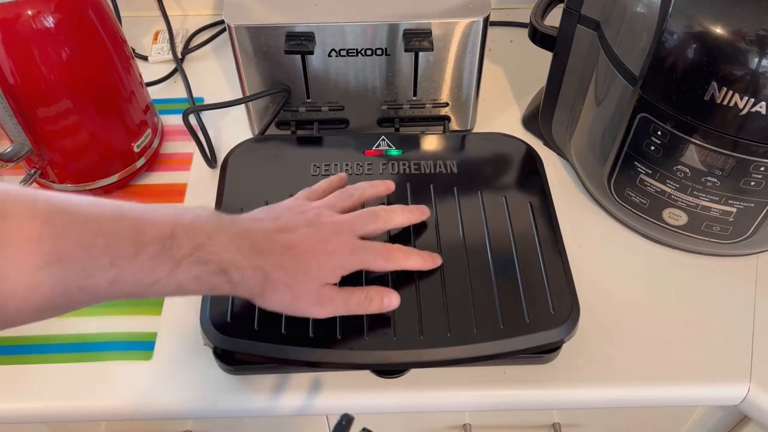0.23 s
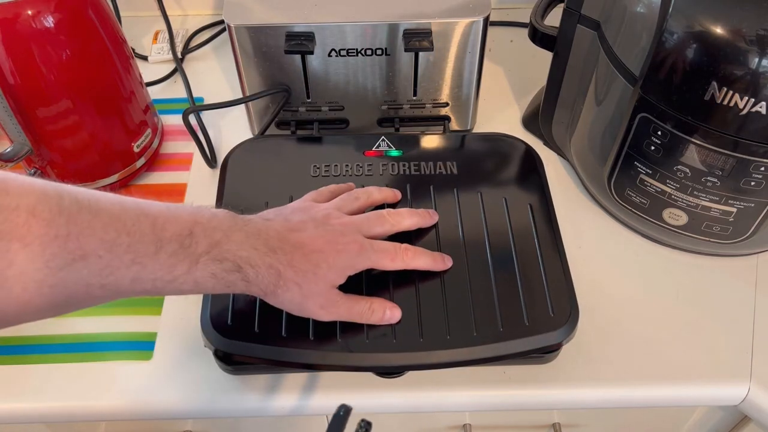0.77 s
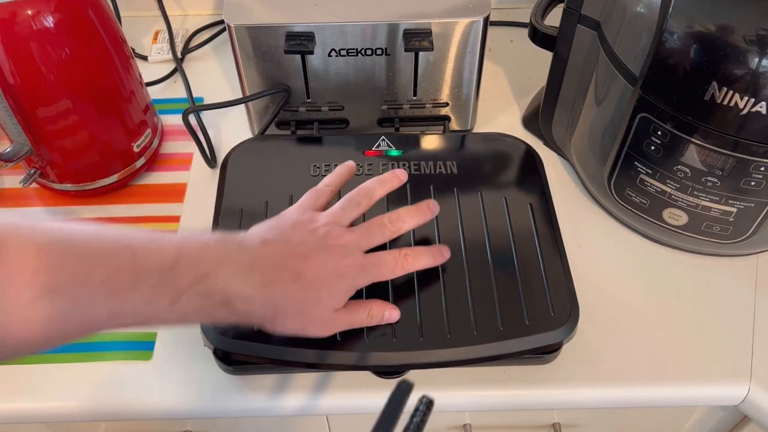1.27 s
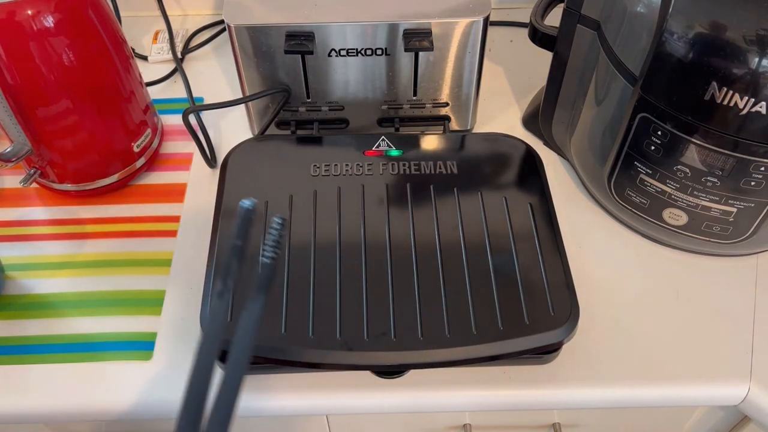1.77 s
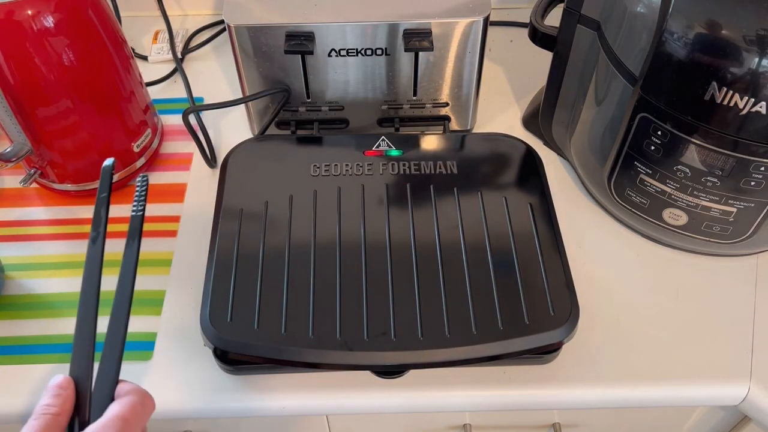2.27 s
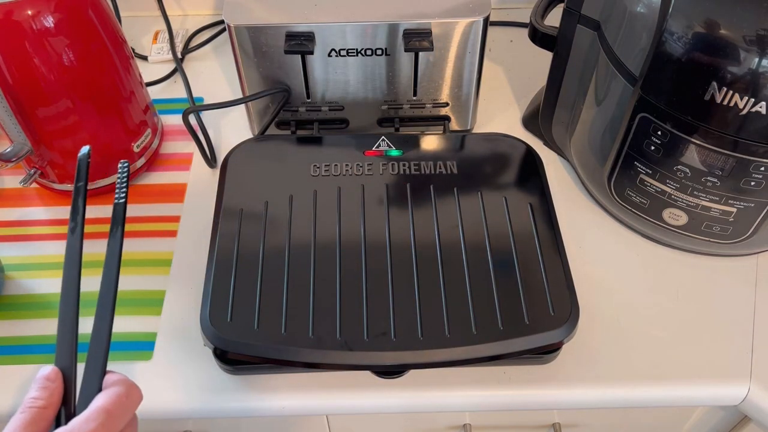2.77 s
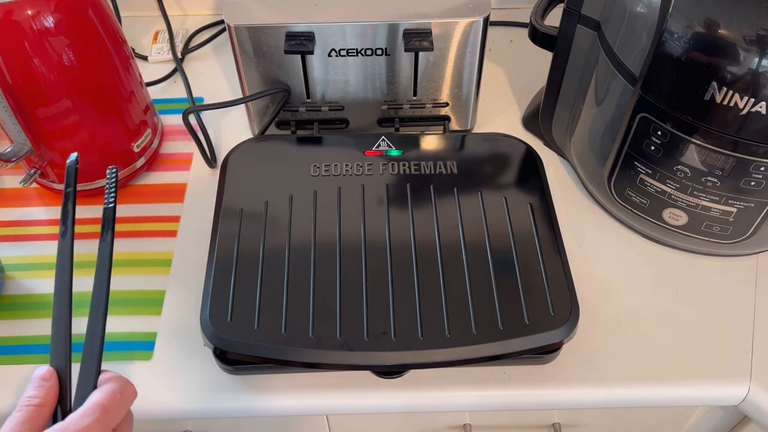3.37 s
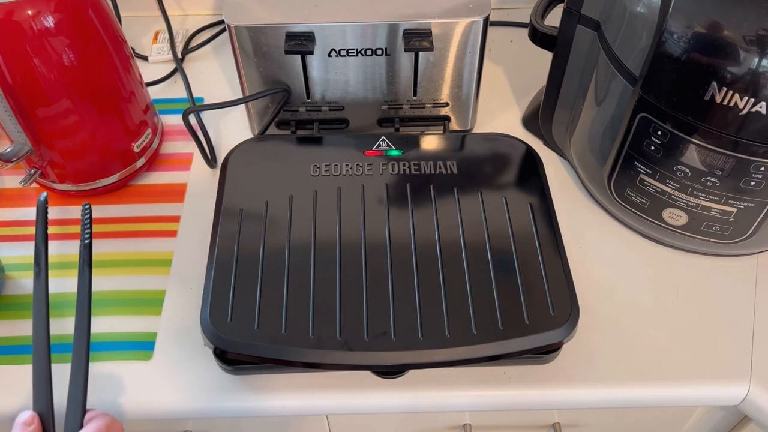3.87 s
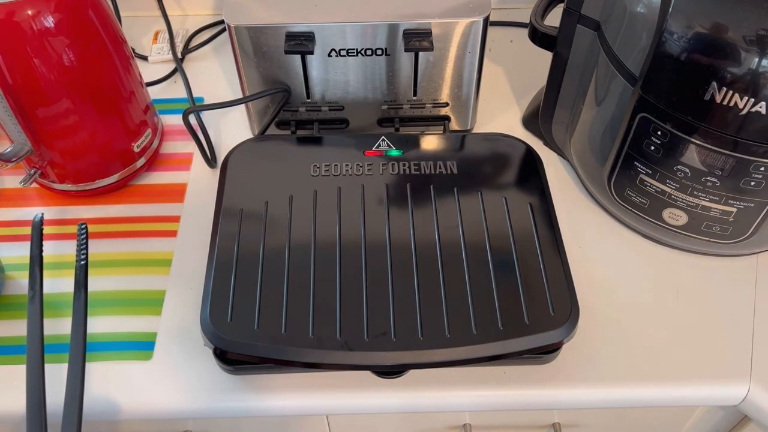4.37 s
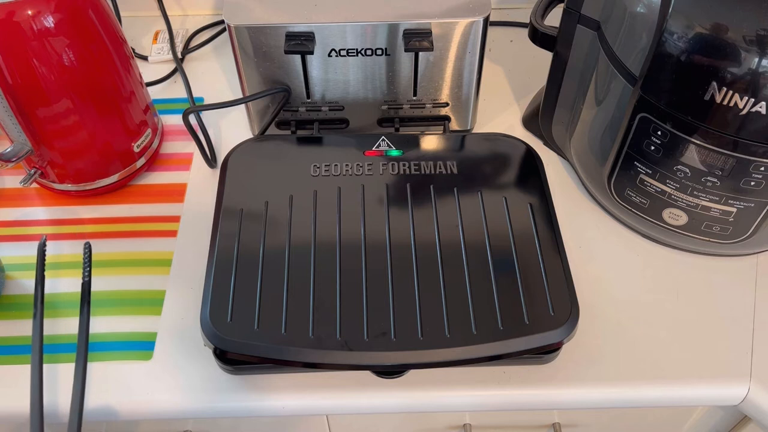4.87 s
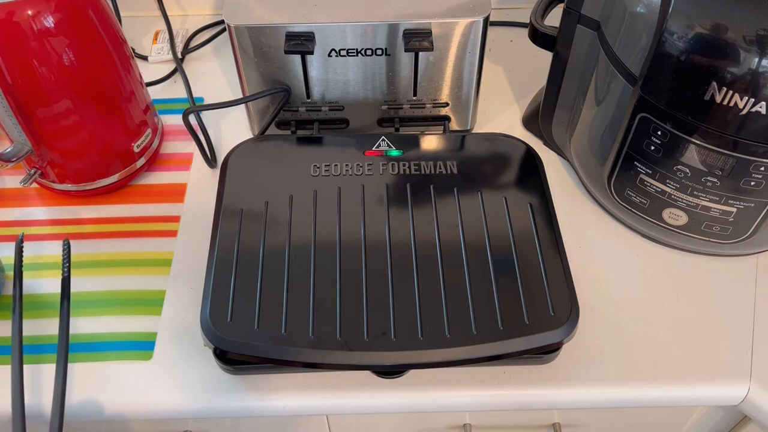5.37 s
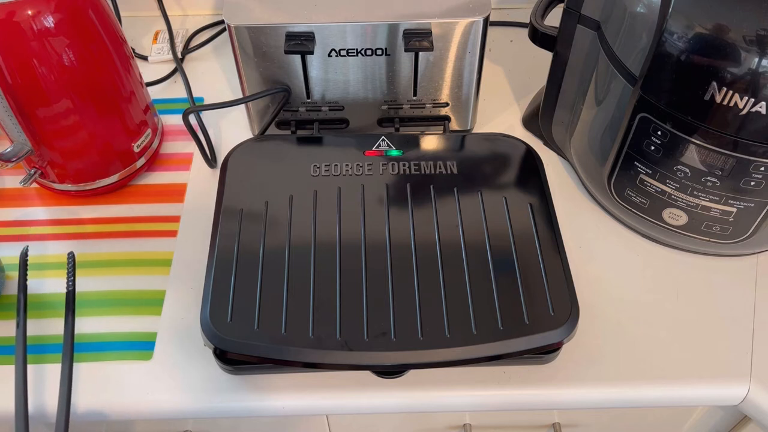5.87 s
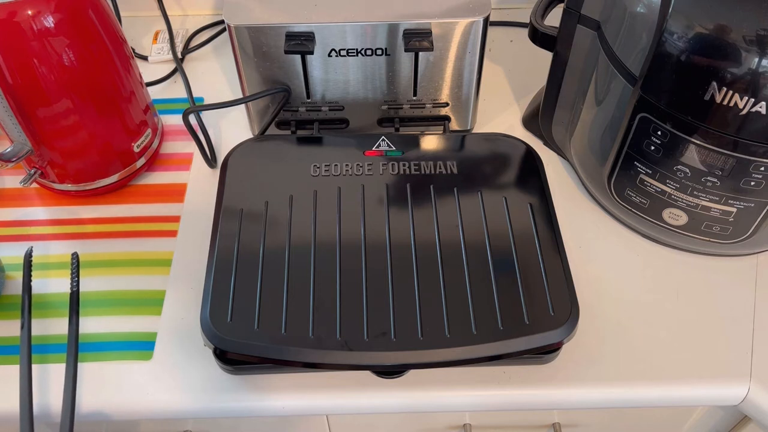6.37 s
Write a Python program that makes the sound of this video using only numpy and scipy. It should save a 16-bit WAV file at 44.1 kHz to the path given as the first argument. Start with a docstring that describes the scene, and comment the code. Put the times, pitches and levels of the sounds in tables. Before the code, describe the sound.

In a kitchen, close up, chicken fries under the closed lid of an electric grill with a dense, bright, steamy hiss. A hand press makes it swell for about a second, then it gradually settles. Small fat spits tick as it eases, tongs make one faint dull bump, and a crisp thermostat click comes near the end. Low appliance hum and soft rumble lie underneath.

```python
"""Chicken on a closed grill

Chicken sizzles under the lid of an electric grill: showers of tiny random bursts over a smooth hiss of steam,
coloured by the hollow between the plates. A hand presses the lid for about a second and the hiss swells, then
settles as the plate dries. Fat spits in short puffs of noise, tongs are picked up with a soft bump of low noise,
and the thermostat clicks near the end with ringing tones and a knock. Hum tones and a low rumble lie underneath.
"""
import sys
import numpy as np
from scipy import signal
from scipy.fft import rfft, irfft, next_fast_len
from scipy.io import wavfile
from scipy.ndimage import map_coordinates

SR = 44100
rng = np.random.default_rng(int(sys.argv[2]) if len(sys.argv) > 2 else 0)


def waveform_to_disk(signal):
    """Save audio, clipped to [-1, 1], as 16-bit WAV at the path in sys.argv[1]."""
    frames = np.transpose(np.atleast_2d(signal))
    scaled = np.clip(frames, -1, 1) * 32767
    samples = np.round(scaled).astype(np.int16)
    wavfile.write(sys.argv[1], SR, samples)


N = 291962  # length in samples

# The hand bears down on the lid and lets go; the squeeze takes a moment to build and to end (all in seconds).
PRESS_S, LIFT_S, ATTACK_S, RELEASE_S = 0.27, 1.1, 0.13, 0.21
# Extra boiling from the squeeze and from juice lying on the plate, which dries once the hand lifts.
SQUEEZE_DB, WET_DB, DRYING_S = 2.5, 5.5, 0.8
# Later the hiss rises a little by itself: time of the peak, width, and height.
RISE_S, RISE_WIDTH_S, RISE_DB = 4.6, 0.5, 0.5
# The sizzle at rest: bubbles a second, hiss, hollow ring under the lid, and spatter relative to the hiss.
BUBBLES_PER_S, HISS_DB, HOLLOW_DB, SPATTER_DB = 2900, -44.5, -48, -16
# How many dB the ring and the spatter's share gain for each dB of boiling.
HOLLOW_GROWS, SPATTER_GROWS = 0.83, 0.68

# Tone of bursting bubbles heard through the gap round the lid. Each row: pitch in Hz, level in dB per Hz.
FIZZ_TONE = [(1200, -22), (2600, -4), (4500, -2.2), (6300, -2.8), (7700, -.3), (8700, 0), (9500, -1.7),
             (10100, -3.3), (10800, 1.6), (11500, 2.8), (12100, -2.7), (13300, -5), (14800, -2.5),
             (16000, -4)]
# Tone of squeezed juice spattering on the hot plate. Each row: pitch in Hz, level in dB per Hz.
SPATTER_TONE = [(900, -20), (1300, 3), (2000, -12), (3200, 7.5), (4200, 0.5), (5500, -4), (9000, -5),
                (15000, -22)]
# Tone of the hollow between the plates. Each row: pitch in Hz, level in dB per Hz.
HOLLOW_TONE = [(150, -25), (330, -9), (470, -1), (590, -15), (820, -8), (1000, -1.5), (1250, -4),
               (1420, -5), (2300, -7.5), (3000, -13.5), (5000, -22)]
# Air resonances between the plates. Each row: centre in Hz, width in Hz, lift in dB (negative is a dip).
CAVITY_RESONANCES = [(965.6, 26.6, 11), (1143, 133, 6.5), (1574, 50, 5), (1682, 41, 9), (1967, 29, 5),
                     (2140, 60, 5.5), (2266, 70, 3.5), (3078, 77, 5), (3370, 150, 3), (3550, 104, -4),
                     (3740, 51, 3.5), (3880, 110, -5), (4000, 85, 4.5), (4260, 130, 3), (5030, 70, 3)]
# Reflections off the toaster, the cupboards and the walls. Each row: delay in seconds, level in dB.
REFLECTIONS = [(.0059, -24), (.0083, -21), (.0113, -20), (.0139, -20), (.0177, -20), (.0231, -21)]
# Single spits of fat. Each row: start in seconds, level in dB.
FAT_SPITS = [(1.284, -29), (1.423, -35), (1.65, -42), (3.596, -44), (4.514, -49), (4.747, -34)]
# Tone of a spit's puff. Each row: pitch in Hz, level in dB per Hz.
PUFF_TONE = [(2000, -16), (7000, -10), (11500, 12), (15000, -8)]
# Tone of the tongs' bump. Each row: pitch in Hz, level in dB per Hz.
BUMP_TONE = [(80, -10), (190, -1), (400, -2), (750, -7), (1500, -22)]
# The thermostat's spring snaps over, hits its stop and bounces.
# Each row: start in seconds, level of the ring in dB, level of the knock on the housing in dB.
THERMOSTAT_SNAPS = [(6.055, -32, -36.5), (6.0585, -31, -46), (6.0653, -50, -45)]
# The spring's ringing tones. Each row: pitch in Hz, level in dB, time to fall by 60 dB in seconds.
SPRING_TONES = [(4490, -8, .035), (5030, 0, .042), (5110, -21, .16), (5290, -11, .03), (5800, -14, .02)]
# Tone of the housing's knock. Each row: pitch in Hz, level in dB per Hz.
HOUSING_TONE = [(200, -14), (430, 1), (620, -2), (800, 2), (1300, -3), (2200, -2), (3000, -9), (5500, -7),
                (8000, -16), (15000, -20)]
# Hum lines of the mains and an appliance motor. Each row: pitch in Hz, rms level in dB.
HUM_LINES = [(27, -73), (50, -65), (68.8, -64.5), (93.4, -50.5), (100, -66), (137.5, -73), (181, -75.5),
             (186.8, -71.5), (200, -73.5), (240.2, -68), (319.5, -69.5)]
# One more hum line swells and fades twice. Each row: peak in seconds, width in seconds, rms level in dB.
WAVER_SWELLS = [(1.5, 0.79, -63), (4.85, 1.63, -62.5)]
WAVER_HZ = 162.6
# Tone of the kitchen's rumble. Each row: pitch in Hz, level in dB per Hz.
RUMBLE_TONE = [(25, -16), (40, -8), (52, -5), (72, 4), (95, -1), (115, -5), (280, -5), (360, -3.5),
               (600, -19), (2000, -21.5)]

# How alike the two microphone ports hear. Each row: pitch in Hz, likeness from 0 to 1.
PORT_LIKENESS = [(100, .99), (350, .87), (650, .6), (1050, .84), (1500, .3), (2200, .68), (4400, .67),
                 (6200, .47), (8400, .85), (11500, .92), (15000, .88)]
# Loudness of left over right. Each row: pitch in Hz, left minus right in dB.
PORT_BALANCE = [(280, -.5), (450, 2.2), (680, -1), (1100, 2.2), (1700, 2.5), (2200, .6), (4300, 3.8),
                (7000, 3.2), (7700, 0)]
# Phase between the ports. Each row: pitch in Hz, lead of the left port in radians.
PORT_LEAD = [(300, 0.57), (1600, -0.64), (2400, 0.5), (3200, 1.36), (4500, 0.22), (6200, 0.26),
             (7300, 0.89), (8300, 0.11)]
TREBLE_HZ, TREBLE_LAG_S = 8300, 0.000277  # above this pitch the left port's lag grows by this delay
TOP_HZ = 15780  # nothing is kept from here up


def sizzle():
    """Juice boils on the plate: more boiling means more bubbles a second and a larger share of spatter."""
    surge_db = boiling()
    rate = BUBBLES_PER_S * amp(surge_db)
    fizz = reflected(under_lid(bubbles(rate, spread_db=2.5, steam_db=1.5), FIZZ_TONE))
    spatter = reflected(under_lid(bubbles(rate / 2, spread_db=4.5, steam_db=-0.5), SPATTER_TONE))
    ring = under_lid(bubbles(rate, spread_db=3, steam_db=1), HOLLOW_TONE)
    frying = fizz + amp(SPATTER_DB + SPATTER_GROWS * surge_db) * spatter
    # The boiling flutters: small random level changes, slow and fast.
    flutter_db = 0.1 * wobble(9) + 0.33 * wobble(45)
    hiss_db = HISS_DB + surge_db + flutter_db
    hollow_db = HOLLOW_DB + HOLLOW_GROWS * surge_db + 0.26 * wobble(13)
    return amp(hiss_db) * frying + amp(hollow_db) * ring


def boiling():
    """Boiling in dB over rest: the squeeze ends quickly as the hand lifts, the wet plate dries slowly."""
    t = np.arange(N) / SR
    since_lift = np.maximum(t - LIFT_S, 0)
    pressing = np.clip((t - PRESS_S) / ATTACK_S, 0, 1)
    letting_go = np.clip(1 - since_lift / RELEASE_S, 0, 1)
    wet = np.exp(-since_lift / DRYING_S)  # fully wet until the hand lifts
    rise_db = RISE_DB * swell(RISE_S, RISE_WIDTH_S)
    return SQUEEZE_DB * pressing * letting_go + WET_DB * wet + rise_db


def bubbles(rate, spread_db, steam_db):
    """Bubbles burst at random, rate a second, with unequal sizes, over a smooth hiss of steam."""
    bursts = rng.random((2, N)) < rate / SR
    sizes = amp(spread_db * np.minimum(rng.exponential(size=(2, N)), 5))
    signs = np.sign(rng.standard_normal((2, N)))
    # Dividing by the root of the rate keeps the level even when bubbles come faster.
    pops = unit(bursts * sizes * signs / np.sqrt(rate))
    return unit(pops + amp(steam_db) * rng.standard_normal((2, N)))


def under_lid(x, tone):
    """Colour a sound by a tone table and by the air resonances between the plates."""
    def response(hz):
        lift_db = 0
        for centre, width, db in CAVITY_RESONANCES:
            lift_db = lift_db + db / (1 + (2 * (hz - centre) / width) ** 2)
        return amp(along(tone, hz) + lift_db)
    return unit(filtered(x, response))


def reflected(x):
    """Near surfaces add weak late copies, which ripple the spectrum."""
    def response(hz):
        copies = sum(amp(db) * np.exp(-2j * np.pi * hz * delay) for delay, db in REFLECTIONS)
        return 1 + copies
    return unit(filtered(x, response))


def spits():
    """Now and then a larger drop of fat bursts in a short bright puff of noise."""
    puffs = sum(amp(db) * dying(s, t60=0.0097) for s, db in FAT_SPITS)
    return puffs * under_lid(rng.standard_normal((2, N)), PUFF_TONE)


def bump():
    """A dull, soft bump of dying low noise as the tongs are taken in hand."""
    return amp(-48.5) * dying(1.58, t60=0.3) * toned_noise(BUMP_TONE)


def thermostat():
    """A steel spring snaps, rings briefly and knocks the housing; the kitchen answers."""
    t = np.arange(N) / SR
    ring, blows = np.zeros(N), np.zeros(N)
    for s, ring_db, knock_db in THERMOSTAT_SNAPS:
        blows += amp(knock_db) * dying(s, t60=0.05)
        for hz, tone_db, t60 in SPRING_TONES:
            ring += amp(ring_db + tone_db) * dying(s, t60) * np.sin(2 * np.pi * hz * (t - s))
    knock = blows * toned_noise(HOUSING_TONE)
    click = knock + ring * np.array([[1], [0]])  # the first signal is the part both ports share
    # The room's answer is half a second of dying noise that begins 11 ms late.
    tail = (rng.standard_normal((2, N)) * dying(0.011, t60=0.4))[:, :SR // 2]
    tail = tail / np.linalg.norm(tail[0])
    room = signal.fftconvolve(click.sum(0)[None], tail, axes=1)[:, :N]
    return click + amp(-10.5) * room


def kitchen():
    """Mains and motor hum, slightly unsteady in level and phase, over a low rumble."""
    t = np.arange(N) / SR
    hum = np.zeros(N)
    for hz, db in HUM_LINES:
        level = amp(db + 0.68 * wobble(1.88)) * np.sqrt(2)  # root 2 turns rms into peak
        phase = 2 * np.pi * (hz * t + rng.random()) + 0.09 * wobble(1.5)
        hum += level * np.sin(phase)
    waver_level = sum(amp(db) * swell(s, width_s) for s, width_s, db in WAVER_SWELLS)
    waver = waver_level * np.sqrt(2) * np.sin(2 * np.pi * WAVER_HZ * t)
    return hum + waver + amp(-56.0) * ports(toned_noise(RUMBLE_TONE))


def ports(pair):
    """Two unrelated signals become left and right, with the ports' likeness, balance and phase."""
    def shares(hz):
        turn = np.arccos(np.clip(along(PORT_LIKENESS, hz), 0, 0.999)) / 2
        return np.array([np.cos(turn), np.sin(turn)])

    sides = np.array([[0.5], [-0.5]])  # each side takes half of the difference

    def difference(hz):
        lag = 2 * np.pi * TREBLE_LAG_S * np.maximum(hz - TREBLE_HZ, 0)
        phase = along(PORT_LEAD, hz) - lag
        return amp(sides * along(PORT_BALANCE, hz)) * np.exp(1j * sides * phase)

    common, apart = filtered(pair, shares)
    return filtered(np.array([common + apart, common - apart]), difference)


def toned_noise(tone):
    """Two unrelated noises shaped by a tone table, at rms 1."""
    return unit(filtered(rng.standard_normal((2, N)), lambda hz: amp(along(tone, hz))))


def filtered(x, response):
    """Multiply the spectrum of x by a response of frequency, with silence added against wrap-around."""
    m = next_fast_len(N + SR // 2)
    return irfft(rfft(x, m) * response(np.fft.rfftfreq(m, 1 / SR)), m)[..., :N]


def dying(s, t60):
    """An envelope that jumps to 1 at time s and falls by 60 dB every t60 seconds."""
    age = np.arange(N) / SR - s
    return (age >= 0) * amp(-60 * np.clip(age / t60, 0, 10))


def swell(s, width_s):
    """A smooth rise and fall that reaches 1 at time s."""
    return np.exp(-((np.arange(N) / SR - s) / width_s) ** 2)


def wobble(rate):
    """A smooth random curve through rate random points a second."""
    points = rng.standard_normal(int(N * rate / SR) + 4)
    return map_coordinates(points, [np.arange(N) * rate / SR])


def along(points, hz):
    """Read a table of pitch and value between its rows, on a log pitch axis."""
    f, v = np.transpose(points)
    return np.interp(np.log(hz + 1), np.log(f + 1), v)


def amp(db):
    """Decibels to gain."""
    return 10 ** (np.asarray(db) / 20)


def unit(x):
    """Scale to rms 1."""
    return x / np.sqrt(np.mean(x ** 2) + 1e-20)


def scene():
    """The grill and the sounds beside it through the two ports, and the kitchen round it."""
    return ports(sizzle() + spits() + bump() + thermostat()) + kitchen()


def record(dry):
    """The microphone side keeps only what lies below the top pitch."""
    return filtered(dry, lambda hz: hz < TOP_HZ)


dry = scene()
out = record(dry)
waveform_to_disk(out)
```